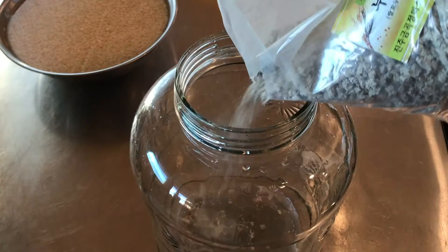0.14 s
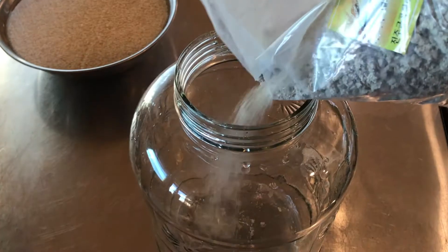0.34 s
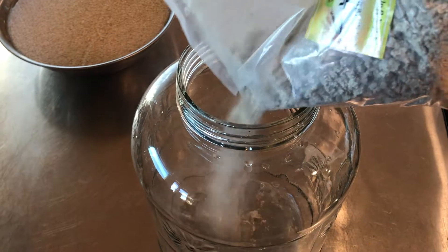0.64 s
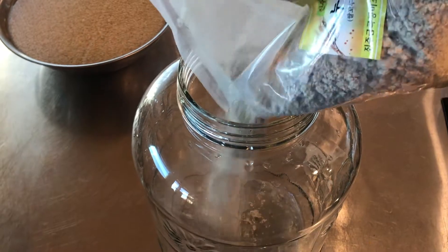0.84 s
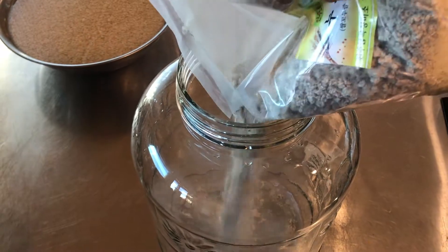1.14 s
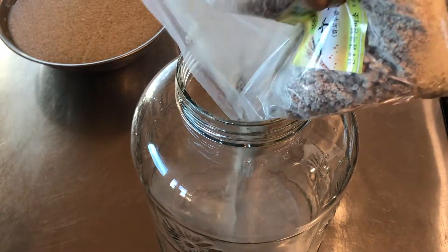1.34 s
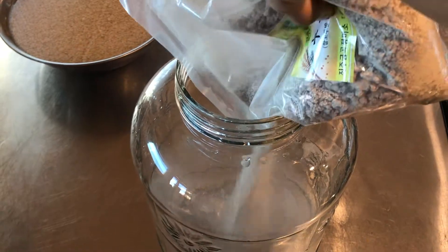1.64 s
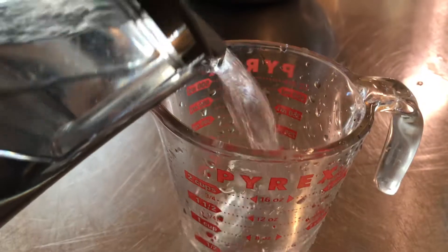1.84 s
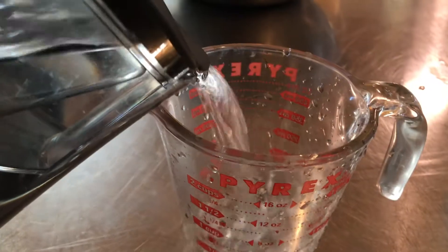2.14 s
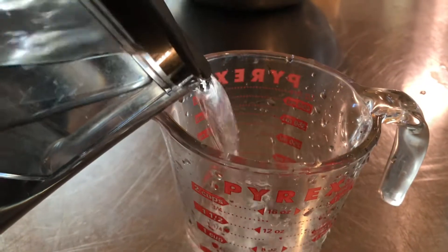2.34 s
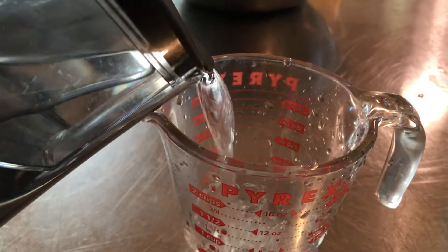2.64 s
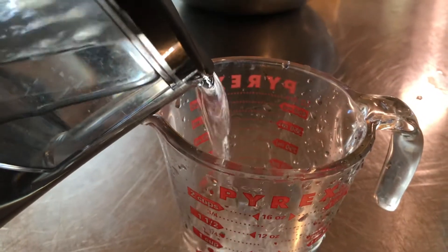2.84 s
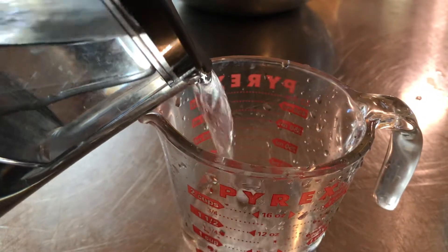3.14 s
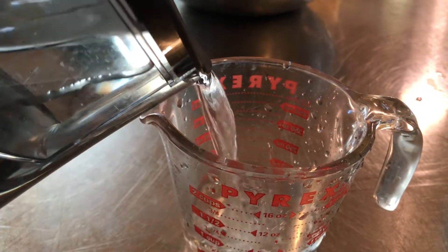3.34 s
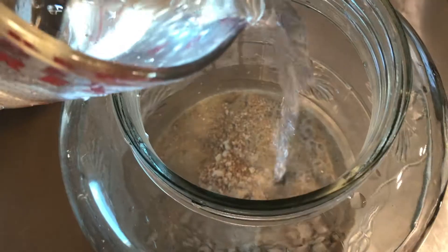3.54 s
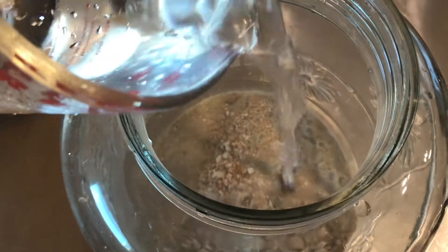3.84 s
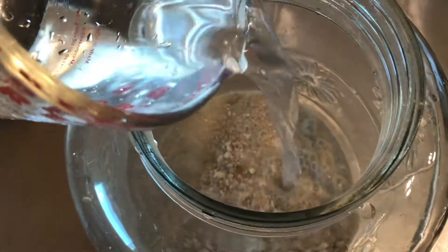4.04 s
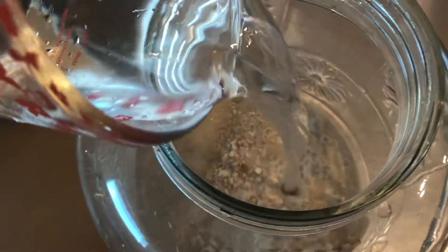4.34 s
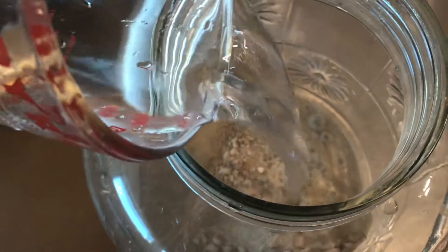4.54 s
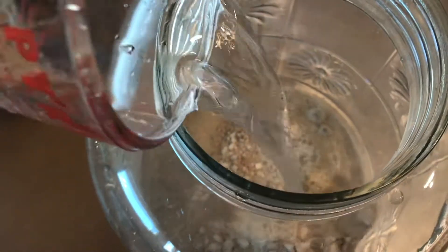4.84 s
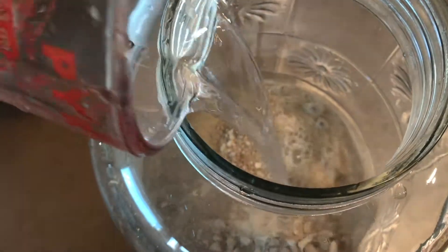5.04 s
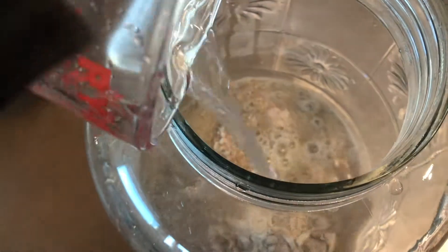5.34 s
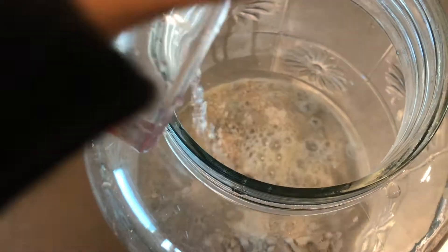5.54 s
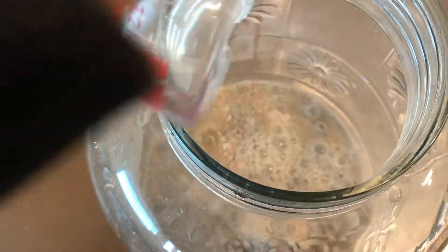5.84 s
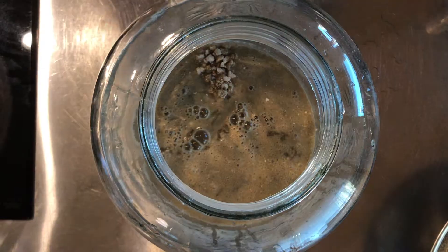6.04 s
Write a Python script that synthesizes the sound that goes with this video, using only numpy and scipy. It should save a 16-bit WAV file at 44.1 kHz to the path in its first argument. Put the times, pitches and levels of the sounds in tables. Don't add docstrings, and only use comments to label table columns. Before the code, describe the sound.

Close to the microphone in a quiet kitchen, dry grain patters and hisses into a large glass jar, ringing its wall with small ticks. Abruptly, softer water gurgles and bubbles into a glass cup. It cuts to a thin, lumpy trickle into the jar, then a much louder full pour, splashing with a hollow boom. Glass clinks lightly, the flow dwindles to drips, and a hard knock on the rim comes just before the end.

```python
import sys
import numpy as np
from scipy import signal
from scipy.fft import rfft, irfft, next_fast_len
from scipy.io import wavfile

SR = 44100
rng = np.random.default_rng(int(sys.argv[2]) if len(sys.argv) > 2 else 0)


def transcribe(signal):
    frames = np.atleast_2d(signal).T
    limited = np.clip(frames, -1, 1)
    pcm = np.round(limited * 32767).astype(np.int16)
    wavfile.write(sys.argv[1], SR, pcm)


def invert_db(x):
    u = np.asarray(x, float) / 20
    return 10 ** u


N = 273464
TIME = np.arange(N) / SR

CUTS = [
    .012,
    1.427,
    1.688,
    3.385,
    4.188,
    5.957,
]


def rms_one(x):
    return x / np.sqrt(np.mean(x ** 2) + 1e-20)


def in_time(*tables):
    s, *columns = np.transpose(np.concatenate(tables))
    s = s + 1e-7 * np.arange(len(s))
    return [np.interp(TIME, s, column) for column in columns]


def take(first_s, last_s):
    return np.clip(np.minimum(TIME - first_s, last_s - TIME) / 0.0018 + .5, 0, 1)


def filtered(x, kind, hz, order=2):
    return signal.sosfilt(signal.butter(order, hz, kind, fs=SR, output="sos"), x)


def high_pass(x, hz):
    return rms_one(filtered(x, "high", hz))


def notch(x, hz, sharpness):
    return signal.lfilter(*signal.iirnotch(hz, sharpness, SR), x)


def microphone(x):
    return filtered(x, "high", 42, order=4)


def noise():
    return rng.standard_normal(N)


def coloured(x, spectrum):
    hz, level_db = np.transpose(spectrum)
    size = next_fast_len(N, True)
    grid = np.fft.rfftfreq(size, 1 / SR) + 1
    gain_db = np.interp(np.log(grid), np.log(hz), level_db, -90, -90)
    return rms_one(irfft(rfft(x, size) * invert_db(gain_db), size)[:N])


def lumps(rate, depth_db):
    r = np.exp(-32 * np.pi * rate / SR)
    slow = signal.lfilter([1], [1, -2 * r, r * r], rng.standard_normal(N // 16 + 502))[500:]
    gain = rms_one(invert_db(depth_db * rms_one(slow)))
    return np.interp(np.arange(N) / 16, np.arange(len(slow)), gain)


def patchy(x, rate, depth_db):
    edges_hz, out = [900, 2700, 4200, 6300, 9500, 16500], 0
    for k, band in enumerate(zip(edges_hz, edges_hz[1:])):
        out = out + (-1) ** k * filtered(x, "band", band) * lumps(rate, depth_db)
    return rms_one(out)


def patter(per_s, spread_db):
    sizes = invert_db(spread_db * np.minimum(rng.exponential(1, N), 5)) * rng.choice([-1, 1], N)
    return rms_one(sizes * (rng.random(N) < per_s / SR))


def clicks_at(times, levels_db):
    out = np.zeros(N)
    out[np.round(np.asarray(times) * SR).astype(int)] = invert_db(np.asarray(levels_db))
    return out


def dying(clicks, seconds):
    return signal.lfilter([1], [1, -np.exp(-1 / (seconds * SR))], clicks + 1e-18)


def rounded(clicks, hz):
    return filtered(clicks + 1e-18, "low", hz)


def ring(clicks, hz, t60):
    r, w = invert_db(-60 / (t60 * SR)), 2 * np.pi * hz / SR
    first, out = np.argmax(clicks != 0), np.zeros(N)
    out[first:] = signal.lfilter([0, np.sin(w)], [1, -2 * r * np.cos(w), r * r], clicks[first:] + 1e-18)
    return out


def cavity(x, modes):
    out, power = 0, 0
    for k, (hz, width_hz, level_db) in enumerate(modes):
        r = np.exp(-np.pi * width_hz / SR)
        top, bottom = [(1 - r * r) / 2, 0, (r * r - 1) / 2], [1, -2 * r * np.cos(2 * np.pi * hz / SR), r * r]
        out = out + (-1) ** k * invert_db(level_db) * signal.lfilter(top, bottom, x)
        power += invert_db(2 * level_db) * np.pi * width_hz / SR
    return out / np.sqrt(power)


def sliding(x, modes, ratio):
    steps, clock = np.arange(N), np.cumsum(ratio)
    stretched = np.interp(np.interp(steps, clock, steps), steps, x)
    return np.interp(clock, steps, cavity(stretched, modes))


def add_bubbles(out, times, gains, pitches, cycles, rise):
    for s, gain, hz, climb in zip(times, gains, pitches, rise + np.zeros(len(times))):
        turns = np.arange(int(cycles / hz * SR)) / SR * hz
        at = int(s * SR)
        shape = np.exp(-5 * turns / cycles) * np.minimum(turns / 0.74, 1)
        out[at:at + len(turns)] += gain * shape * np.sin(2 * np.pi * turns * (1 + climb * turns / cycles))


def swarm(first, last, count, centre_hz, octaves, cycles, rise):
    draw, out = rng.random((count, 3)), np.zeros(N)
    times = first + (last - first) * draw[:, 0]
    pitches = centre_hz[(times * SR).astype(int)] * 2 ** (octaves * (draw[:, 1] - .5))
    add_bubbles(out, times, -np.log(draw[:, 2]), pitches, cycles, rise)
    return rms_one(out) * np.sqrt((last - first) * SR / N)


def droplets(table, hiss, pip_db, snap_db, snap_s):
    s, peak_db, hz = np.transpose(table)
    out = dying(clicks_at(s, peak_db + snap_db), snap_s) * hiss
    add_bubbles(out, s, invert_db(peak_db + pip_db), hz, cycles=34, rise=0.024)
    return out


def room():
    # pitch_hz, level_db (per Hz)
    air_noise = [(25, -4.5), (84, -6), (285, -11), (439, -18), (545, -17), (641, -22), (695, -15.5),
                 (16000, -41)]
    # start_s, end_s, level_db
    drone_takes = [
        (0.001, 1.448, -65.5),
        (1.425, 3.392, -81),
        (3.39, 4.188, -82),
        (4.18, 5.975, -71),
    ]
    air = invert_db(-77) * coloured(noise(), air_noise) * take(CUTS[0], 9)
    level = sum(invert_db(level_db) * take(a, b) for a, b, level_db in drone_takes)
    return air + cavity(noise(), [(57.6, 6.1, 0)]) * level


def far_grain():
    # pitch_hz, level_db (per Hz)
    far_colour = [(59, -42), (100, -4), (202, -11), (524, -11.5), (634, -14), (891, -3.5), (2000, -1.5),
                  (4380, -14), (16000, -18)]
    fade_db = -69 + 16 * (1.8 - TIME)
    return invert_db(fade_db) * coloured(patter(9000, 2.3), far_colour) * take(CUTS[1], CUTS[2])


def clink():
    # pitch_hz, level_db, t60_s
    clink_modes = [(706, 10.5, 0.043), (1780, -2, .15), (2100, -3.5, 0.17), (2401, -4.5, 0.27),
                   (3736, -4.5, 0.21), (6000, -27, 0.2)]
    touch = clicks_at([5.198, 5.198 + 0.029], [-40, -40 - 23])
    return sum(invert_db(level_db) * ring(touch, hz, t60) for hz, level_db, t60 in clink_modes)


def after_rings():
    # start_s, pitch_hz, level_db, t60_s
    tones = [(5.655, 2160, -64, .3), (5.80, 232, -65, 1.5), (4.845, 1112, -52, .3), (5.49, 1112, -55, .3),
             (5.575, 1112, -54, .12), (5.651, 200, -56, .04), (5.49, 2610, -54, .25), (5.42, 2400, -55, .3)]
    return sum(ring(clicks_at([s], [level_db]), hz, t60) for s, hz, level_db, t60 in tones)


def knock():
    # pitch_hz, level_db, t60_s
    knock_modes = [(128.5, 1, 0.082), (212, -5.5, 0.13), (606, 9.5, 0.057), (1140, -8, 0.04),
                   (312, -4, 0.046), (1722, -10, 0.055), (2100, -4.5, 0.17), (2616, -2.5, 0.024),
                   (3176, -4, 0.026), (3900, -12.5, 0.03), (4950, -30, 0.0212), (6150, -16.5, 0.082),
                   (8080, -23, .08), (770, -6.5, 0.056)]
    # pitch_hz, width_hz, level_db
    fizz = [(7460, 300, 5.5), (8890, 300, -1), (11600, 900, 1), (14040, 399, -2.5), (15130, 400, -1.5)]
    knock_s, knock_db = 5.9345, -18.5
    blow = clicks_at([knock_s, knock_s + .0022], [knock_db - 1.5, knock_db - 10.5])
    since_s = np.maximum(TIME - knock_s, 0)
    late = 1 - np.exp(-(since_s / .004) ** 3)
    soft = 1 - np.exp(-(since_s / 0.0004) ** 2)
    out = np.zeros(N)
    for k, (hz, level_db, t60) in enumerate(knock_modes):
        out += (-1) ** (k + 1) * invert_db(level_db) * (late if hz < 900 else soft) * ring(blow, hz, t60)
    dull = rms_one(filtered(noise(), "band", [700, 4200], order=3))
    out += soft * (invert_db(-8.0) * dying(blow, .005) + invert_db(-25.0) * dying(blow, 0.027)) * dull
    return out + invert_db(-28.5) * soft * dying(blow, .009) * cavity(noise(), fizz)


def cup_gurgle(gurgle_hz):
    loudest_s = 2.69
    level_db = -66 + np.minimum(35 * (TIME - loudest_s), 16 * (loudest_s - TIME))
    crowd = swarm(CUTS[2], CUTS[3], count=800, centre_hz=gurgle_hz, octaves=0.28, cycles=33, rise=0.043)
    hum = sliding(patter(1500, 3.0), [(770, 70, 0)], gurgle_hz / 780)
    return invert_db(level_db - 3.3) * crowd + invert_db(level_db - 10.0) * hum


def cup_bubbles(small_db):
    # start_s, peak_db, pitch_hz, climb (share of the pitch)
    single_bubbles = [(1.756, -61, 1060, 0.55), (1.757, -63, 1750, .03), (1.848, -42, 1525, 0.13),
                      (1.895, -56, 750, .013), (1.9, -60, 915, 0.41), (1.922, -57.5, 762, .013),
                      (1.961, -47, 1980, 0.13), (1.993, -56, 1630, .08), (2.018, -54, 2150, .05),
                      (2.064, -50, 1640, 0.23), (2.11, -68, 1510, .2), (2.205, -52, 1840, .08),
                      (2.22, -58, 890, 0.091), (2.275, -52, 773, .013), (2.338, -49, 2130, .1),
                      (2.388, -46.5, 2080, .1), (2.44, -46, 1170, .15), (2.469, -53, 790, .013),
                      (2.655, -51, 956, 0.13), (2.661, -48, 767, 0.012), (2.764, -52, 784, 0.012),
                      (2.844, -45.5, 2380, 0.1), (2.87, -54, 1950, .08), (2.875, -53.5, 770, .013),
                      (3.181, -56, 557, .05)]
    out = invert_db(small_db) * swarm(CUTS[2], CUTS[3], count=1100, centre_hz=np.full(N, 1650.), octaves=1.33,
                                cycles=27, rise=0.048)
    s, peak_db, hz, climb = np.transpose(single_bubbles)
    big = hz < 850
    for group, trim_db, cycles in [(~big, -7.5, 61), (big, -8.5, 72)]:
        add_bubbles(out, s[group], invert_db(peak_db[group] + trim_db), hz[group], cycles, climb[group])
    return out


def cup_spray(spray_db, small_db):
    # pitch_hz, level_db (per Hz)
    spray_colour = [(530, -86), (900, 9), (1340, -19), (1550, -3.5), (2190, -1.5), (2690, -12),
                    (3150, -0.5), (4010, -18), (5160, -19), (8980, -16), (10500, -33.5), (12600, -12),
                    (16000, -20)]
    fine = swarm(CUTS[2], CUTS[3], count=700, centre_hz=np.full(N, 6500.), octaves=2.15, cycles=39, rise=0.016)
    out = invert_db(spray_db - 8.5) * lumps(39, 4.2) * fine
    spray = patchy(coloured(patter(5000, 2.6), spray_colour), 38, 2.8)
    out += invert_db((spray_db + small_db) / 2 - 2.0) * spray * lumps(35.0, 7.0)
    spatter = patter(1500, 5.5) * lumps(39, 6)
    early_db = -4.6 * np.clip((2.1 - TIME) / .3, 0, 1)
    cup_modes = [(3350, 250, -24), (3700, 81, 7.0), (6050, 390, -4), (7400, 130, -20), (11400, 230, -9)]
    out += invert_db(spray_db - 9.5 + early_db) * cavity(spatter, cup_modes)
    fill_db = -4.1 * np.clip((2.3 - TIME) / 0.92, 0, 1)
    return out + invert_db(spray_db - 15.0 + fill_db) * cavity(spatter, [(8700, 670, 0)])


def cup_pops():
    # start_s, peak_db, pitch_hz
    pops = [(1.714, -54, 7400), (1.814, -47, 7100), (1.8274, -41, 4960), (2.002, -43, 5900),
            (2.0356, -49, 3060), (2.1704, -49, 3740), (2.204, -44, 6070), (2.2376, -51, 3000),
            (2.272, -53, 3700), (2.4297, -46, 6600), (2.4437, -46, 9000), (2.6516, -50, 3840),
            (2.699, -44, 2980), (2.753, -49.5, 3600), (2.803, -52, 6150), (2.8432, -53, 3650),
            (2.872, -43, 3130), (2.8964, -49, 6050), (3.0994, -59, 8600), (3.1268, -46.5, 5800),
            (3.2113, -47, 6050), (3.331, -49.5, 3600), (3.368, -46, 8700), (3.3915, -46, 3900)]
    # pitch_hz, width_hz, level_db
    hiss_modes = [(5200, 1900, 1), (6600, 1400, 3), (9000, 830, -4), (12100, 2300, -16)]
    # start_s, peak_db, pitch_hz
    wall_drops = [(1.8136, -62, 7040), (1.9049, -55, 14600), (1.9398, -62, 11100), (1.956, -59, 12900),
                  (1.9902, -55, 12200), (2.002, -53, 12300), (2.051, -56, 7040), (2.1109, -66, 11400),
                  (2.1688, -63, 7020), (2.2097, -58, 7040), (2.2576, -63, 13400), (2.2695, -58, 9370),
                  (2.3179, -59, 13400), (2.4297, -59, 8450), (2.4437, -55, 9200), (2.6982, -54, 8540),
                  (2.7894, -62, 15200), (2.8038, -58, 8500), (2.8482, -60, 8540), (2.8961, -56, 9250),
                  (2.9196, -54, 12100), (2.9754, -62, 8550), (3.0667, -63, 12000), (3.0995, -60, 8450),
                  (3.3301, -62, 8400), (3.366, -57, 10900), (3.3695, -59, 12700)]
    hiss = noise()
    out = droplets(wall_drops, high_pass(hiss[::-1], 7000), 0.92, -9.5, 0.0029)
    s, peak_db, hz = np.transpose(pops)
    add_bubbles(out, s, invert_db(peak_db - 8), hz, cycles=35, rise=.03)
    bursts = dying(clicks_at(s, peak_db - 16.5), 0.0022)
    return out + bursts * patchy(cavity(hiss, hiss_modes), 60, 3.5)


def cup():
    # start_s, flow_db, gurgle_hz
    filling = [
        (1.688, -70.5, 740),
        (1.852, -67.5, 766),
        (2.0, -71.5, 756),
        (2.286, -69, 786),
        (2.78, -72, 797),
        (3.02, -72, 592),
        (3.385, -73, 530),
    ]
    spray_db, gurgle_hz = in_time(filling)
    pool_db = -20 * np.clip(1 - (TIME - CUTS[2]) / 0.27, 0, 1)
    small_db = spray_db - 3 + pool_db - 8.9 * np.maximum(TIME - 2.9, 0)
    out = cup_gurgle(gurgle_hz) + cup_bubbles(small_db) + cup_spray(spray_db, small_db) + cup_pops()
    return notch(out, 2720, 7.0) * take(CUTS[2], CUTS[3])


def grain_rumble():
    # pitch_hz, level_db (per Hz)
    rumble_colour = [(25, -53), (48, -17), (82, -33.5), (114, 6.5), (151, -1), (372, -0.5), (763, -7.5),
                     (1170, -16.5), (1980, -120)]
    # start_s, pitch_hz, level_db, t60_s
    thuds = [
        (.298, 344, -46, 0.059),
        (0.644, 310, -48, 0.023),
    ]
    slump_s = .62
    level_db = -64 + 12 * (TIME > slump_s) * np.exp(-np.abs(TIME - slump_s) / 0.15)
    out = invert_db(level_db) * coloured(noise(), rumble_colour) * lumps(4.2, 0.75)
    return out + sum(ring(clicks_at([s], [peak_db]), hz, t60) for s, hz, peak_db, t60 in thuds)


def grain_rain(patter_db, top_db):
    # pitch_hz, level_db (per Hz)
    grain_colour = [(410, -7), (757, -17), (1110, 0.5), (1870, -5), (2100, -2.5), (2880, -2), (3410, -2),
                    (4920, -2), (5470, -4), (8760, -9), (14400, -17.5), (16000, -22)]
    # start_s, peak_db, very_top_db (share)
    surges = [(0.0209, -38, -28), (0.107, -32.5, -18.5), (0.1416, -35.5, -12), (0.184, -28.5, -7.5),
              (0.205, -32, -17.5), (0.2713, -33, -21), (0.3062, -37, -15.5), (0.3621, -49, -18),
              (0.4094, -41, -19.5), (0.4364, -27, -10), (0.466, -29.5, -16), (0.5094, -43.5, -19),
              (0.9368, -47, -15), (1.0071, -42, -17), (1.0394, -39, -24)]
    # pitch_hz, width_hz, level_db
    neck_modes = [(5820, 79, 0), (6330, 63, -0.5), (6485, 70, -3), (7400, 70, 2.5), (8540, 45, -11),
                  (8900, 69, 3.5), (10900, 54.5, -24), (11700, 45, -15.5)]
    flutter = lumps(30, 0.8)
    rain = coloured(patter(9000, 2.3), grain_colour) * flutter
    top = filtered(rain, "high", 4000)
    out = invert_db(patter_db + 3.5) * rms_one(rain - top) + invert_db(top_db + 2.0) * rms_one(top * flutter)
    s, peak_db, share_db = np.transpose(surges)
    rattle = dying(clicks_at(s, peak_db - 16.0), 0.029) + invert_db(top_db - 18.0) * (TIME < .62)
    out += rattle * (rms_one(cavity(top, neck_modes)) + invert_db(-3.0) * rms_one(top))
    return out + dying(clicks_at(s, peak_db + share_db - 10.0), 0.013) * high_pass(top, 10500)


def glass_wall(top_db):
    # start_s, tick_db, ring_db, place (shoulder 0 to belly 1)
    kernels = [(0.014, -64, -36, 0.06), (0.183, -39, -44.5, 0.1), (0.2092, -25, -35.5, 0.025),
               (0.3055, -32, -35, 0.077), (0.3631, -45, -35.5, 1), (0.414, -44, -36.5, .8),
               (0.4683, -43, -35, 0.79), (0.5092, -46, -37.5, 0.9), (0.604, -40, -45, 1),
               (0.8047, -17.5, -54, 0.24), (1.0289, -53, -36, 0.16), (1.3374, -10, -48.5, 0.15)]
    # pitch_hz, level_db, t60_s
    wall_modes = [
        [(993, -8.5, 0.52), (1133, 2, 0.3), (1165, -11, 0.102)],
        [(1940, -15.5, 0.15), (2112, 0.5, 0.19), (2109, -5, 0.13)],
        [(3490, -19.5, 0.16), (3565, -4.5, 0.47), (3880, -19, 0.15), (4108, 0, 0.2), (4430, -8.5, 0.1),
         (5330, -1.5, 0.26), (5270, -1, 0.34), (5300, -10.5, 0.1)],
    ]
    s, tick_db, ring_db, place = np.transpose(kernels)
    place = np.clip(place, .01, .99)
    belly_db, shoulder_db = ring_db + 20 * np.log10(place), ring_db + 20 * np.log10(1 - place)
    high_db = ring_db - 2.5 + 5 * np.log10(place)
    out = ring(clicks_at(s, tick_db - 28.5), 1630, 0.027) + ring(clicks_at(s, tick_db - 13.0), 3170, 0.0041)
    drive_db = -54.5 + 1.28 * (top_db + 51)
    bare = np.clip((.85 - TIME) / 0.22, .05, 1)
    for modes, level_db in zip(wall_modes, [belly_db, shoulder_db, high_db]):
        small = bare * invert_db(drive_db - 31.5) * patter(800, 3.6)
        for hz, mode_db, t60 in modes:
            uneven_db = rng.normal(0, 2, len(s))
            out += invert_db(mode_db) * ring(clicks_at(s, level_db - 7.0 + uneven_db) + small, hz, t60)
    return out


def grain():
    # start_s, flow_db, hardness_db (of the landing)
    stream = [
        (.012, -53, -0.5),
        (.068, -51, -1),
        (.17, -53.5, -3),
        (.185, -50, 6),
        (.27, -48.5, -9),
        (.43, -46, -1.5),
        (.64, -46.5, -5),
        (1.02, -52.5, -4.5),
        (1.427, -52, -4.5),
    ]
    mouth_dips = [2874, 4860]
    patter_db, hard_db = in_time(stream)
    top_db = patter_db + hard_db
    out = grain_rain(patter_db, top_db) + grain_rumble() + glass_wall(top_db)
    for hz in mouth_dips:
        out = .45 * out + .55 * notch(out, hz, 9.0)
    return out * take(CUTS[0], CUTS[1])


def jar_drips(sheet):
    # start_s, peak_db, pitch_hz, hiss_db
    drips = [(5.646, -54, 4550, -73), (5.6978, -40.5, 3230, -75), (5.6997, -43, 4600, -78),
             (5.7264, -41, 4700, -50.5), (5.728, -38, 9500, -77.5), (5.748, -51, 3300, -64),
             (5.8323, -52, 9760, -61.5)]
    s, peak_db, hz, hiss_db = np.transpose(drips)
    out = dying(clicks_at(s, peak_db - 33.0), 0.013) * sheet
    add_bubbles(out, s, invert_db(peak_db + 3.0), hz, cycles=14, rise=0.043)
    bursts = dying(clicks_at(s, hiss_db), 0.0027) + dying(clicks_at(s, hiss_db - 7.0), 0.031)
    return out + bursts * rms_one(np.diff(rng.standard_normal(N + 2), 2))


def jar_spray(spray_db, surge, churn, top_modes):
    # pitch_hz, level_db (per Hz)
    jar_colour = [(1650, -46), (2800, -18.5), (3080, -24.5), (3340, -0.5), (4000, -6), (4340, 0),
                  (5020, -7.5), (6380, 1.5), (7170, -3.5), (10300, -7), (14600, -4), (16000, -14)]
    # start_s, peak_db, pitch_hz
    stream_drops = [(3.4456, -45.5, 7050), (3.4534, -53, 6910), (3.4705, -61, 3370), (3.509, -46, 7300),
                    (3.5524, -48.5, 11000), (3.5653, -53, 6050), (3.5946, -43, 6920), (3.6102, -46, 4700),
                    (3.6254, -56, 6940), (3.6471, -51, 3450), (3.6924, -47, 3250), (3.7399, -51, 6670),
                    (3.7566, -46, 7230), (3.7686, -43.5, 7240), (3.776, -46, 3450), (3.7894, -49, 3400),
                    (3.8254, -52, 3230), (3.8482, -51, 11500), (3.8482, -48.5, 7200), (3.8774, -51, 3040),
                    (3.9136, -47.5, 3440), (3.9589, -52, 3350), (3.9777, -61, 4430), (4.0385, -58, 6770),
                    (4.0538, -45, 6930), (4.0841, -69, 3670), (4.152, -55, 3210), (4.1914, -41.5, 4300),
                    (4.3594, -58, 3500), (4.6927, -50, 5640), (4.7147, -48.5, 3220), (4.727, -47.5, 5700),
                    (5.4271, -60, 3140), (5.5244, -52, 2980)]
    spray = invert_db(spray_db - 1.5) * surge + churn
    out = invert_db(-5.5) * spray * patchy(coloured(patter(5500, 3.6), jar_colour), 55, 4.1)
    sheet = coloured(noise(), jar_colour)
    out += droplets(stream_drops, sheet, -1.1, -12.0, 0.0064)
    out += invert_db(spray_db - 12.0) * sheet
    out += invert_db(-7) * cavity(spray * patter(1500, 5.0), top_modes)
    tiny = swarm(CUTS[3], 5.6, count=500, centre_hz=np.full(N, 5500.), octaves=1.69, cycles=110, rise=0.022)
    return out + invert_db(-8.5) * spray * tiny + jar_drips(sheet)


def jar_boom(boom_db, low_db, churn, fuller, boom_modes):
    # pitch_hz, width_hz, level_db
    slosh = [(200, 140, -11.5), (282, 31.4, -1), (338.5, 40, 0.5), (390.4, 85, -6)]
    dribble = TIME >= 5.56
    deep_db = np.where(dribble, -9.5, 6 * fuller)
    out = cavity((invert_db(boom_db + deep_db) + invert_db(-7.0) * churn) * noise(), boom_modes)
    stir = invert_db((boom_db + low_db) / 2 + 0.5) * lumps(11.0, 2.6) * invert_db(5.4 * dribble)
    return out + cavity((stir + invert_db(-4.0) * churn) * noise(), slosh)


def jar():
    # start_s, flow_db, breakup_db (of the stream)
    pour = [
        [(3.385, -72, 8), (3.591, -64, -2.5), (4.013, -70.5, 10.5), (4.188, -70, 5)],
        [(4.188, -54, -12), (4.3, -54, -1), (4.588, -60, -0.5), (5.01, -54, 0.5), (5.194, -53, -1.5),
         (5.446, -58, 2), (5.59, -61, 5.5), (5.65, -67.5, 6), (5.88, -73.5, 4)],
    ]
    # pitch_hz, width_hz, level_db
    air_modes = [
        [(126.9, 8.5, -7)],
        [(576.5, 26.3, 6), (631, 30, -4), (678, 14, -5.5), (1089, 45, 0), (1310, 210, -17)],
        [(1776, 258, 4.5), (1988, 220, 2.5), (2380, 160, 4), (2948, 120, 0.5), (3350, 290, -13)],
        [(3300, 60, 1.5), (3740, 100, -1.5), (4300, 69, -7), (5220, 90, -2), (5740, 200, -3),
         (7020, 170, -14.5), (8860, 340, -10)],
    ]
    # start_s, peak_db
    glugs = [(3.394, -57), (3.448, -60), (3.511, -58), (3.551, -65), (3.612, -57), (3.676, -61),
             (3.723, -63), (3.772, -54.5), (3.917, -58), (4.01, -58.5), (4.104, -75), (4.175, -64),
             (4.193, -43.5), (4.267, -64), (4.3, -46.5), (4.343, -52.5), (4.389, -47), (4.429, -47),
             (4.527, -48), (4.583, -52.5), (4.62, -57), (4.638, -54), (4.67, -43), (4.723, -52),
             (4.745, -48.5), (4.791, -61), (4.847, -44), (4.883, -47), (4.926, -54), (4.964, -45.5),
             (5.031, -41), (5.076, -54), (5.119, -51), (5.198, -41.5), (5.222, -42), (5.386, -43.5),
             (5.436, -45.5), (5.493, -48.5), (5.539, -40.5), (5.579, -43), (5.656, -61), (5.68, -63.5),
             (5.699, -63), (5.729, -55.5)]
    # start_s, peak_db
    slaps = [(3.393, -68), (3.4313, -53), (3.4688, -45.5), (3.4974, -63), (3.5506, -58), (3.5835, -55),
             (3.6112, -46), (3.6496, -45), (3.717, -51), (3.741, -60), (3.767, -52), (3.7796, -49),
             (3.8074, -60), (3.8285, -44.5), (3.877, -60), (3.9144, -62), (4.0433, -47), (4.101, -51),
             (4.167, -53), (4.19, -44.5), (4.2015, -36.5), (4.2485, -45), (4.2986, -54), (4.3562, -48),
             (4.3709, -39), (4.3955, -40), (4.4155, -49), (4.5093, -50), (4.62, -45), (4.6774, -52),
             (4.74, -55), (4.76, -49), (4.789, -62), (4.8445, -48), (4.9453, -63), (4.9826, -31.5),
             (5.0137, -38), (5.0346, -39), (5.0474, -33), (5.079, -38), (5.1108, -37), (5.1358, -41),
             (5.164, -55), (5.1968, -38), (5.306, -36), (5.3523, -47), (5.423, -40), (5.4533, -36.5),
             (5.481, -55), (5.495, -39), (5.532, -40.5), (5.5751, -38)]
    boom_modes, low_modes, high_modes, top_modes = air_modes
    low_db, breakup_db = in_time(*pour)
    thin = TIME < CUTS[4]
    plunge_db = 15 * (TIME > CUTS[4]) * np.exp(-((TIME - CUTS[4]) / 0.16) ** 2)
    boom_db = -67.5 + 0.54 * (low_db + 55.5) + 0.48 * plunge_db
    high_db = low_db + breakup_db
    spray_db = -67 + 0.54 * (low_db + 58.0) + breakup_db + plunge_db + 4.5 * thin
    glug, slap = clicks_at(*np.transpose(glugs)), clicks_at(*np.transpose(slaps))
    low_churn = invert_db(-6.5) * dying(glug, 0.0046)
    high_churn, top_churn = invert_db(-9.5) * dying(slap, 0.0092), invert_db(-27.5) * dying(slap, 0.0046)
    surge = lumps(45, 1.9) ** np.where(thin, 1.6, 1)
    fuller = np.clip((TIME - 4.9) / 0.34, 0, 1)

    climb = 0.025 * np.clip(TIME - 4.5, -1, 1) * (TIME > CUTS[3])
    ratio = 1 + climb + 0.024 * (lumps(13, 4.5) - 1)
    low_flow = invert_db(low_db - 1.0 - 8.0 * (TIME > 5.76)) * surge ** 0.28 + low_churn
    column = sliding(low_flow * patter(1500, 4.1) + invert_db(22.5) * rounded(glug, 970), low_modes, ratio)
    out = 0.44 * column + 0.52 * notch(column, 860, 3.0)
    high_flow = invert_db(high_db - 2.0 - 3.8 * (TIME > 5.66)) * surge + high_churn
    slapped = sliding(high_flow * patter(2000, 3.1) + invert_db(15.5) * rounded(slap, 3600), high_modes, ratio)
    out += notch(slapped, 2720, 8.0)
    full_flow = (invert_db(low_db) * surge + low_churn) * patter(1100, 2.4)
    out += fuller * invert_db(-8.0) * cavity(full_flow, [(657, 21, 0)])
    out += jar_boom(boom_db, low_db, low_churn, fuller, boom_modes)
    out += jar_spray(spray_db, surge, top_churn, top_modes)
    return out * take(CUTS[3], CUTS[5])


def scene():
    touches = (clink() + after_rings() + knock()) * take(0, CUTS[5])
    return microphone(room() + far_grain() + touches + cup() + grain() + jar())[None]


def top_cut(x):
    return signal.sosfilt(signal.butter(12, 16500, fs=SR, output="sos"), x)


def record(dry):
    rounded_peaks = .26 * np.tanh(dry / .26)
    mix = signal.sosfilt(signal.cheby2(12, 60, 16900, fs=SR, output="sos"), rounded_peaks)
    return top_cut(mix)


dry = scene()
out = record(dry)
transcribe(out)
```